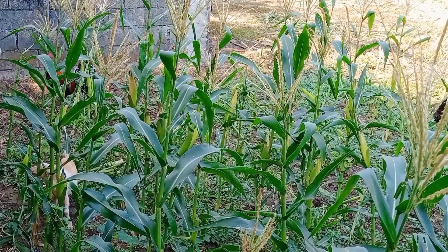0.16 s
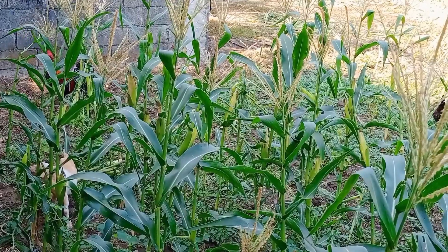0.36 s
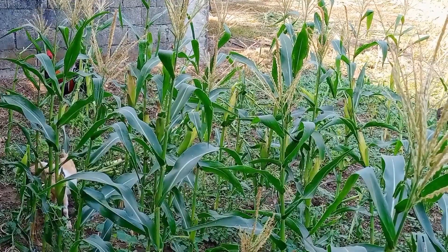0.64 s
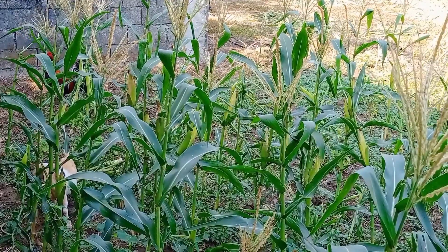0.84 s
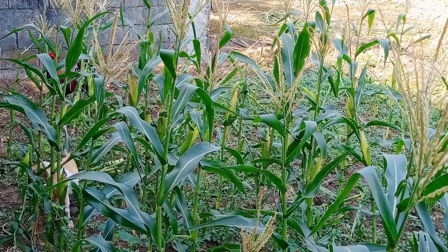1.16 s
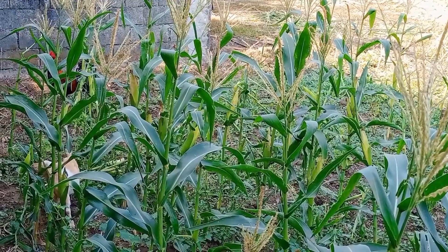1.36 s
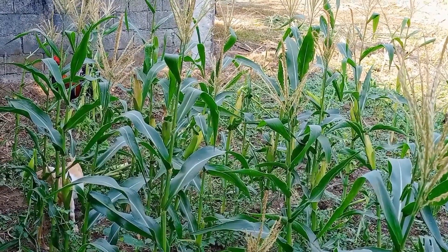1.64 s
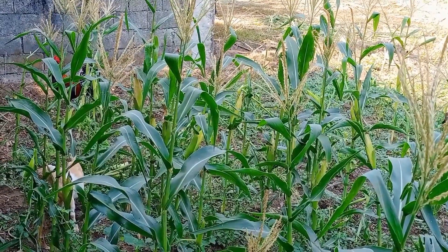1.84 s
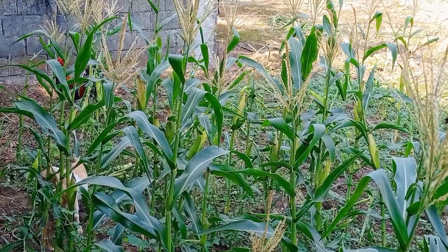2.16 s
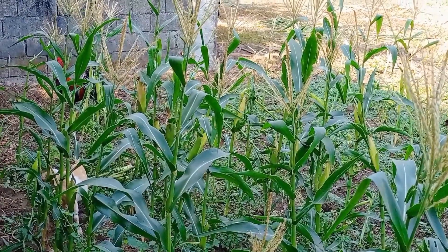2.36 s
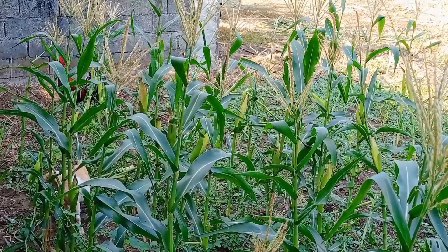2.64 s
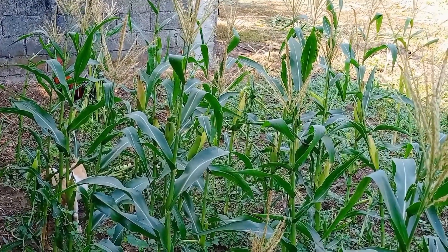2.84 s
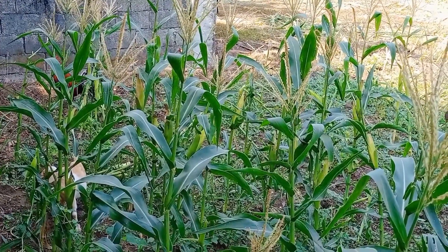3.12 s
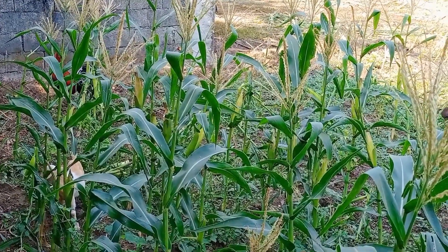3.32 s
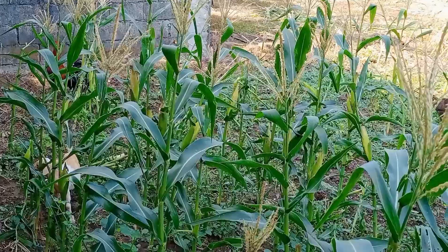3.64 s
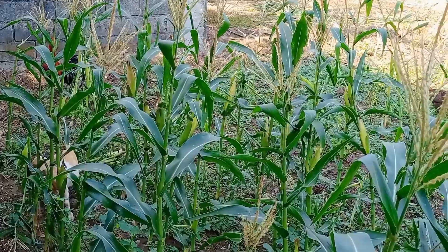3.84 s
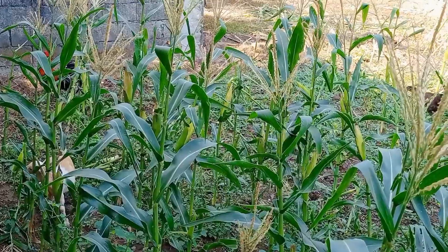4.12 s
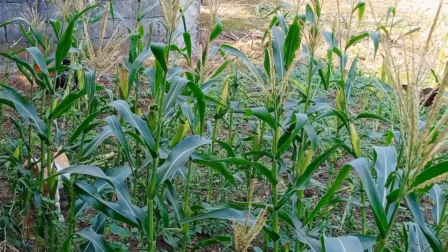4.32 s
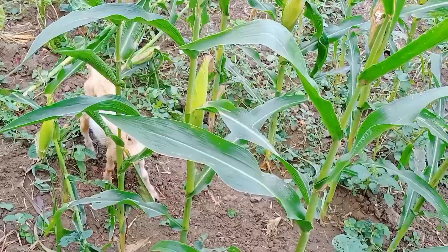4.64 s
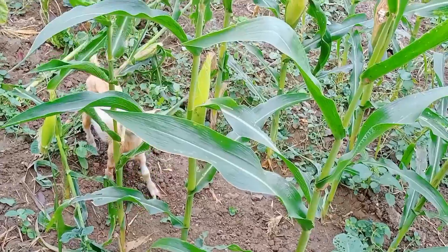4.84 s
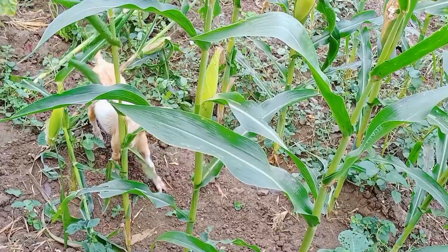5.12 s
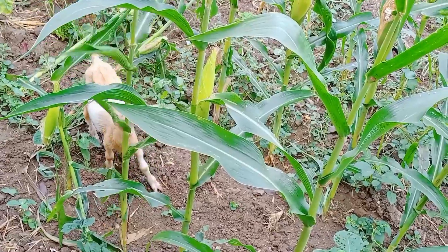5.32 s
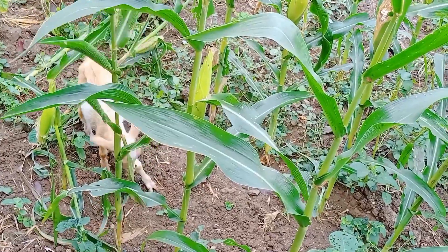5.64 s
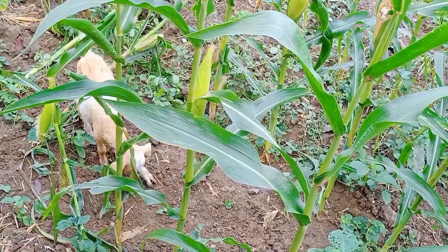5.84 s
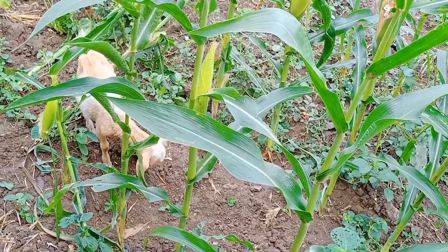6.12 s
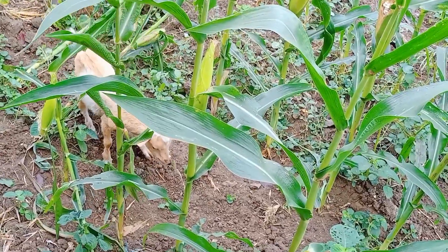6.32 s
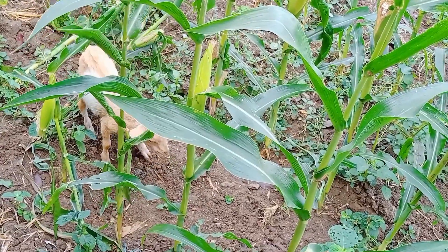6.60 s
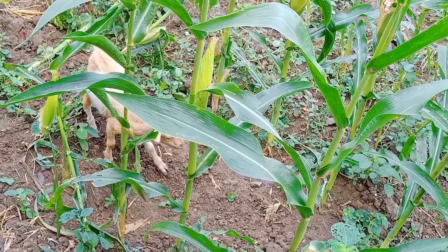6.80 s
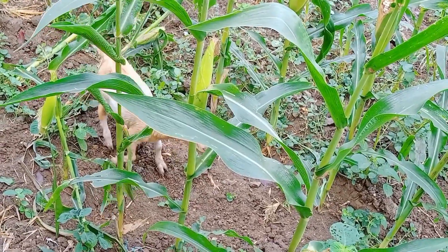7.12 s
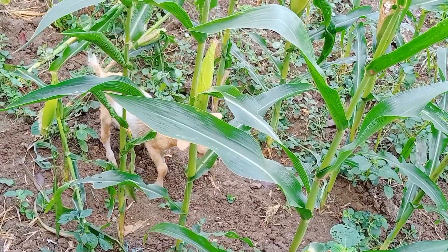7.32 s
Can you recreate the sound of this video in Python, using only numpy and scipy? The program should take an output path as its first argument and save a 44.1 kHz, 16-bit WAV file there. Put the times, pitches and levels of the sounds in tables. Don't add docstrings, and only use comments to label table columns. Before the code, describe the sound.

Outdoors at a maize plot, a buzzing bird chatter opens, then clear chirps and hooked notes take over. A near bird repeats a falling whistle followed by a short chip while gusts thump the microphone. At about 4.5 seconds the scene cuts to fast raspy chatter, with the whistle returning later. A distant flock hisses behind, and echoes linger. The sound is dense, level-pumped and slightly saturated.

```python
import sys
import numpy as np
from scipy import signal
from scipy.fft import rfft, irfft, next_fast_len
from scipy.io import wavfile
from scipy.ndimage import uniform_filter1d, minimum_filter1d

SR = 44100
rng = np.random.default_rng(int(sys.argv[2]) if len(sys.argv) > 2 else 0)


def store_wav(level_fs):
    pcm = np.round(np.clip(np.atleast_2d(level_fs), -1, 1) * 32767)
    wavfile.write(sys.argv[1], SR, pcm.T.astype(np.int16))


def makeup_ratio(level_db):
    decades = np.asarray(level_db, float) / 20
    return 10 ** decades


N = 328986

SPLICE_S, OVERLAP_S = 4.6, .1
HOARSE_S = 5.68
BREEZE_DB, NEXT_SCENE_S, NEXT_BREEZE_DB = -44.5, 4.5, -39.5
CHORUS_DB = -31
DRONE_HZ, DRONE_WIDTH_HZ = 146, 26

# start_s, length_s, from_hz, to_hz, level_db
CHATTER = [(0, 0.04, 4300, 4750, -19.5), (0, 0.035, 2806, 2750, -15.5), (.02, .02, 3990, 4050, -15.5),
           (.031, 0.34, 2900, 2678, -9), (.06, 0.12, 3240, 3545, -16.5), (.235, 0.035, 4300, 3740, -13),
           (.3, 0.31, 3730, 3540, -29.5), (.472, 0.019, 4080, 3610, -11.5), (4.495, 0.11, 4853, 3250, -12),
           (4.595, 0.1486, 3366, 3440, -5.5), (4.62, 0.26, 4180, 3740, -19), (4.665, 0.17, 2978, 3035, -8),
           (4.8, 0.17, 3093, 2930, -15.5), (4.93, 0.24, 2775, 2830, -10.5), (5.05, .15, 2392, 2513, -10.5),
           (5.17, 0.047, 2820, 3250, -17), (5.02, 0.32, 4110, 3765, -26.5), (5.425, .1, 3904, 3830, -10),
           (5.525, 0.14, 3990, 3950, -17.5), (5.51, 0.08, 3450, 3150, -9), (5.6, .1, 3016, 3462, -4.5),
           (5.7, 0.1, 3095, 2800, -7.5), (5.88, 0.1, 2517, 3040, -5), (6, 0.26, 3030, 2670, -19.5),
           (6.6, 0.14, 2910, 3030, -12), (6.802, .06, 3740, 4400, -15)]
# start_s, length_s, from_hz, to_hz, level_db
BABBLE = [(0, 0.038, 1653, 1697, -11.5), (0, 0.051, 1990, 1940, -12.5), (.045, 0.45, 2352, 2230, -8),
          (.06, 0.45, 1720, 1718, -24), (2.77, 0.16, 2178, 2000, -16), (2.78, 0.139, 1724, 1860, -19),
          (4.795, 0.16, 2352, 2074, -8), (4.8, 0.29, 1706, 1828, -9.5), (5.168, .035, 1182, 1664, -18.5),
          (5.205, .12, 1652, 1801, -3.5), (5.33, 0.11, 1550, 1867, -15), (5.595, 0.023, 2300, 2074, -12),
          (5.715, 0.047, 2340, 2230, -14), (5.81, 0.21, 2214, 1781, -9), (5.85, 0.4, 1807, 1845, -15.5),
          (5.96, .36, 2415, 2191, -6.5), (6.35, 0.19, 2276, 2066, -11.5), (6.64, .06, 2600, 1882, -10),
          (6.7, 0.087, 2328, 1915, -12), (6.68, 0.16, 1824, 1800, -32), (6.78, 0.071, 2607, 2320, -20)]
# start_s, length_s, from_hz, to_hz, level_db
SLURS = [(.75, 0.051, 3180, 2665, -15.5), (.96, 0.12, 2834, 2910, -18), (1.52, 0.02, 1696, 1660, -31),
         (1.65, 0.0097, 2990, 2180, -36), (1.66, .08, 1800, 1850, -25.5), (1.74, .1, 1950, 2260, -19.5),
         (1.82, 0.33, 2297, 2202, -25), (1.88, .24, 1580, 1770, -23.5), (2.08, 0.26, 1518, 1310, -20),
         (2.16, 0.036, 3263, 3696, -6.5), (2.73, 0.13, 1228, 1120, -28.5), (2.72, 0.064, 1836, 1820, -21),
         (2.73, 0.1, 2793, 2637, -14), (2.4, 0.27, 1055, 1056, -40.5), (2.92, 0.36, 1105, 1102, -34.5),
         (3.02, 0.058, 2134, 2217, -15.5), (3.14, 0.096, 2210, 2154, -20.5),
         (3.07, 0.1435, 2064, 1853, -15.5), (3.11, 0.16, 1572, 1488, -20.5),
         (3.29, 0.112, 1526, 1421, -11.5), (3.072, 0.036, 684, 576, -26.5), (3.89, 0.065, 2590, 2277, -28),
         (4.01, 0.16, 4120, 4160, -29.5), (4.021, 0.26, 2702, 2680, -20.5), (4.13, 0.17, 1698, 1852, -28),
         (6.45, 0.12, 3130, 3270, -48)]
# start_s, length_s, from_hz, to_hz, level_db
FAR_SEEPS = [(.02, 0.58, 7980, 8720, -38), (.211, 0.37, 9190, 9390, -42), (.411, 0.18, 5780, 5700, -48.5),
             (4, 0.26, 8070, 8450, -43), (4.17, 0.078, 4326, 4950, -40.5), (4.41, .035, 6100, 7600, -36.5),
             (4.51, 0.04, 6100, 7500, -37), (4.43, .15, 8200, 8300, -44), (3.8, .1, 8300, 8250, -46),
             (3.92, .07, 5900, 5850, -48), (4.45, .13, 6250, 6350, -44), (4.15, .2, 7300, 6000, -46)]
# start_s, length_s, from_hz, to_hz, level_db
SLIDES = [
    (.25, .05, 7640, 5020, -42),
    (3.811, .085, 9400, 5000, -32),
    (4.025, .02, 9000, 6800, -41),
    (4.155, .037, 8300, 4600, -37),
    (4.328, .08, 8700, 4650, -31),
    (4.83, .095, 9020, 4900, -41),
    (7.314, .02, 7000, 5000, -34),
]
# band_hz, t60_s
GROVE_DECAY = [(600, 1.5), (1800, 0.92), (3500, 1.52), (6000, 0.32), (10000, 0.96)]
# band_hz, level_db (per Hz)
CHORUS_SPECTRUM = [(300, -37), (500, -23), (700, -13), (1200, -15), (1700, -8), (2500, -6.5), (3800, -6),
                   (4500, -22), (5100, -27), (6500, -40), (8400, -26.5), (10500, -44), (11500, -35.5),
                   (15400, -60.5), (15800, -90.5)]
# time_s, level_db
RUSTLE = [
    (0, -4),
    (.5, -4),
    (.62, 2),
    (2.35, 4),
    (2.7, -1),
    (4.6, 1),
    (4.75, -1),
    (7.46, -3),
]
# time_s, level_db
DRONE = [
    (0, -41.5),
    (.45, -38),
    (.8, -52),
    (1.601, -56),
    (4.501, -41.5),
    (4.999, -43),
    (7.46, -48),
]
# start_s, length_s, level_db
GUSTS = [
    (1.684, 0.52, -33.5),
    (2.331, .6, -33),
    (3.048, 0.077, -30.5),
    (3.297, 0.5, -36),
    (3.818, .24, -39.5),
    (4.169, 0.32, -36),
    (6.844, 0.14, -42),
    (7.211, .14, -37),
]
# band_hz, level_db (per Hz)
BUFFET_SPECTRUM = [(15, -74.5), (25, -33), (55, -7), (109, 1), (213, -4), (600, -17.5), (677, -19.5),
                   (900, -19.5), (1170, -41), (1980, -120)]
# time_s, peak_db
THUMPS = [(1.95, -22), (2.072, -18.5), (2.389, -24.5), (2.535, -24), (3.332, -27.5), (3.557, -23),
          (3.641, -21.5), (3.932, -22), (4.22, -28), (4.28, -28), (4.368, -24), (4.999, -24), (5.403, -38),
          (5.897, -26)]
# start_s, length_s, pitch_hz, level_db
HOLDS = [(0.531, 0.17, 3406, -11), (0.711, 0.14, 5180, -31.5), (.97, 0.37, 5200, -53),
         (2.12, 0.071, 3117, -12), (4.29, 0.085, 2330, -28.5), (4.629, 0.18, 2310, -25.5),
         (5.336, 0.14, 2328, -20), (5.568, 0.063, 4960, -46), (6.07, 0.1, 5030, -45),
         (5.08, 0.14, 3980, -33), (6.33, 0.029, 3120, -17.5), (7.007, .16, 4270, -16),
         (1.048, .036, 3270, -10), (7.032, 0.039, 2820, -16), (7.346, 0.048, 3967, -12)]
# start_s, length_s, from_hz, to_hz, level_db
DROPS = [(.556, 0.027, 4900, 4500, -21), (0.68, 0.025, 4500, 3000, -17.5), (.84, 0.049, 4420, 3700, -26),
         (1.128, .012, 4600, 2300, -15), (1.647, .012, 4550, 2500, -18), (.8, .012, 4700, 3300, -30.5),
         (6.265, 0.06, 4920, 4900, -33), (6.236, 0.036, 4820, 3200, -18.5), (7.3, 0.03, 4350, 4300, -15.5),
         (6.61, 0.034, 4490, 3200, -16), (6.75, 0.051, 3810, 2610, -12.5), (6.1, 0.037, 3300, 4700, -18),
         (6.795, .024, 3000, 4600, -18.5), (7.14, 0.022, 3500, 2500, -17), (7.115, .02, 3900, 2800, -17),
         (7.166, 0.04, 4230, 2950, -8.5), (7.068, 0.026, 3877, 2725, -10.5), (7.8, 0.019, 3920, 2950, -18),
         (7.212, 0.036, 3900, 2610, -6.5), (7.248, 0.02, 3815, 2850, -14.5), (7.4, 0.039, 4190, 3680, -13)]
# start_s, length_s, from_hz, to_hz, level_db
HOOKS = [
    (.962, 0.086, 2530, 2210, -13.5),
    (1.235, 0.14, 4240, 3623, -5.5),
    (1.75, 0.15, 4154, 3504, -7.5),
    (2.225, 0.065, 2370, 2202, -13),
    (2.33, 0.062, 3884, 3478, -5),
    (2.33, 0.022, 2260, 2235, -24),
    (5.015, 0.08, 4340, 3930, -26.5),
    (6.158, .078, 6040, 4720, -25),
]
# start_s, length_s, from_hz, to_hz, level_db
RISES = [
    (1.088, 0.055, 3420, 3960, -6),
    (1.57, 0.091, 3157, 4030, -10),
    (6.59, .06, 3590, 3850, -10.5),
    (6.98, 0.03, 4120, 4370, -15.5),
]
# start_s, length_s, from_hz, to_hz, level_db
SEEPS = [(1.981, 0.16, 8560, 8980, -45), (2.17, 0.056, 8200, 9050, -36), (2.28, 0.039, 7950, 8110, -33.5),
         (2.391, 0.17, 9270, 8780, -41.5), (2.491, 0.077, 8400, 8540, -51), (2.55, 0.036, 7800, 8430, -33),
         (2.62, 0.15, 8730, 8550, -33), (2.72, 0.34, 8060, 8550, -36.5), (2.811, 0.16, 9130, 10100, -34.5),
         (4.99, 0.14, 9640, 9130, -37.5), (5.931, 0.22, 8320, 8470, -45), (6.11, 0.43, 9500, 9500, -48.5)]
# start_s, length_s, from_hz, to_hz, level_db
PLUNGES = [
    (6.553, .04, 7100, 3600, -15),
    (6.925, .024, 7000, 4600, -33),
    (7.314, .024, 7000, 4100, -21),
]
# after_onset_s, pitch_hz, level_db
WHISTLE = [(-.004, 3600, -20), (.003, 4650, -4), (.05, 3960, 0), (.095, 3600, -2), (.13, 3520, -4),
           (.175, 3520, -7)]
# after_onset_s, pitch_hz, level_db
CHIP = [(-.01, 3933, -30), (0, 4350, -1), (.016, 3820, 3), (.04, 3050, -6.5), (.072, 2600, -12)]
# after_onset_s, pitch_hz, level_db
FLICK = [(-.003, 4200, -3), (.004, 6300, -6), (.01, 6400, -34), (.017, 6200, -9), (.028, 5900, -13)]
# start_s, level_db
WHISTLES = [
    (1.8814, -12),
    (2.4014, -10),
    (2.9477, -8.5),
    (3.5194, -7),
    (5.7854, -17),
    (6.334, -8),
    (6.8783, -8),
    (7.4354, -13.5),
]
# start_s, level_db
CHIPS = [
    (2.1493, -12),
    (2.6741, -14),
    (3.2306, -13),
    (3.8083, -13.5),
    (6.0746, -21),
]
# start_s, level_db
FLICKS = [(2.115, -31), (2.382, -38), (2.643, -31), (2.928, -38), (3.206, -33), (3.499, -36), (3.777, -33),
          (5.772, -46), (6.041, -46), (6.858, -45), (7.134, -39)]
# time_s, peak_db
TICKS = [
    (2.4994, -31),
    (3.6486, -35),
    (6.57, -40.5),
    (6.9127, -37),
]
# band_hz, level_db
CAPSULE = [(6500, -21.5), (8500, -19.5), (10300, -27.5), (11400, 6), (13500, 5.5), (15000, -24)]


def evened(x):
    return x / np.sqrt(np.mean(x ** 2) + 1e-20)


def read(points, hz):
    f, value = np.transpose(points)
    return np.interp(np.log(hz + 1), np.log(f + 1), value)


def coloured(x, points):
    size = next_fast_len(len(x))
    gain = makeup_ratio(read(points, np.fft.rfftfreq(size, 1 / SR)))
    return irfft(rfft(x, size) * gain, size)[:len(x)]


def add(mix, s, sound):
    part = mix[round(max(s, 0) * SR):][:len(sound)]
    part += sound[:len(part)]


def drift(hz):
    z = rfft(rng.standard_normal(N))
    return evened(irfft(z * np.exp(-(np.fft.rfftfreq(N, 1 / SR) / hz) ** 2), N))


def note(rows, warble, fade_s=0.0027):
    s, hz, db = np.transpose(rows)
    t = np.arange(s[0], max(s[-1], s[0] + .01), 1 / SR)
    pitch = uniform_filter1d(np.interp(t, s, hz), size=200, mode="nearest")
    pitch *= 1 + warble[np.clip((t * SR).astype(int), 0, N - 1)]
    edges = np.clip(np.minimum(t - t[0], t[-1] - t) / fade_s, 0, 1)
    level = np.sqrt(2) * makeup_ratio(np.interp(t, s, db)) * np.sin(np.pi / 2 * edges) ** 2
    return level * np.sin(2 * np.pi * np.cumsum(pitch) / SR)


def flock(notes, unsteady, hz=30, trill=0):
    mix, wobble = np.zeros(N), drift(hz)
    warble = trill + unsteady * evened(wobble - uniform_filter1d(wobble, size=2200))
    for rows in notes:
        add(mix, rows[0][0], note(rows, warble))
    return mix


def sung(notes, ease, crest, rise_db, fade_db):
    u = np.linspace(0, 1, num=12)
    crest = np.clip(crest, .05, .95)
    before = np.maximum(1 - u / crest, 0)
    after = np.maximum((u - crest) / (1 - crest), 0)
    swell_db = rise_db * before ** 2 + fade_db * after ** 2
    return [np.transpose([s + length * u, to_hz + (from_hz - to_hz) * (1 - u) ** ease, db + swell_db])
            for s, length, from_hz, to_hz, db in notes]


def hidden_birds():
    beat = 2 * np.pi * np.cumsum(76 * (1 + .12 * drift(6))) / SR
    warble = .022 * np.where(np.arange(N) / SR < HOARSE_S, 1, 1.8)
    upper = flock(sung(CHATTER, 1.3, 0.66, -3, -8), warble, 70, .035 * np.sin(beat))
    lower = flock(sung(BABBLE, 1.2, 0.9, 0.5, -5), warble, 60, .04 * np.sin(beat))
    calm = flock(sung(SLURS, 1.7, 0.53, 0.5, -4.5) + sung(FAR_SEEPS, 2.2, 1.0, 4.5, -6), 0.02, hz=45)
    calm += flock(sung(SLIDES, 1.1, 0.19, -1, -3), 0.0036)
    pulses = 1.5 * (.5 + .5 * np.cos(beat)) ** 1.3 + .15
    flutter = makeup_ratio(3.5 * drift(40))
    return (upper + lower) * pulses * flutter, calm * flutter


def grove(old, new, gap_s, early_db):
    taps = rng.standard_normal(SR + SR // 2)
    hz, t, z = signal.stft(taps, SR, nperseg=256)
    decay = makeup_ratio(-60 * t / read(GROVE_DECAY, hz)[:, None])
    tail = signal.istft(z * decay, SR, nperseg=256)[1]
    age = np.arange(len(tail)) / SR - gap_s
    tail *= (age > 0) * (1 + makeup_ratio(early_db) * np.exp(-np.maximum(age, 0) / 0.011))
    tail /= np.linalg.norm(tail)
    cut = np.clip((SPLICE_S - np.arange(N) / SR) / .03, 0, 1)
    return cut * signal.fftconvolve(old, tail)[:N] + signal.fftconvolve(new, tail)[:N]


def chorus():
    frames, hz = N // 256 + 5, np.fft.rfftfreq(1024, 1 / SR)
    a, b, patches = rng.standard_normal((frames, 513, 3)).T
    patches = uniform_filter1d(patches, size=6, axis=0)
    patches = evened(uniform_filter1d(patches, size=30, axis=1))
    z = (a + 1j * b) * makeup_ratio(read(CHORUS_SPECTRUM, hz)[:, None] + 3.0 * patches)
    rustle_db = np.interp(np.arange(frames) * 256 / SR, *np.transpose(RUSTLE))
    low = np.clip((1800 - hz) / 400, 0, 1)
    z *= makeup_ratio(np.outer(low, rustle_db))
    return makeup_ratio(CHORUS_DB) * evened(signal.istft(z, nperseg=1024, noverlap=768)[1][:N])


def drone():
    hz, (s, db) = np.fft.rfftfreq(N, 1 / SR), np.transpose(DRONE)
    band = np.exp(-((hz - DRONE_HZ) / DRONE_WIDTH_HZ) ** 2)
    hum = irfft(rfft(rng.standard_normal(N)) * band, N)
    return makeup_ratio(np.interp(np.arange(N) / SR, s, db)) * evened(hum)


def wind_level():
    t = np.arange(N) / SR
    level = makeup_ratio(np.where(t < NEXT_SCENE_S, BREEZE_DB, NEXT_BREEZE_DB))
    for s, length, db in GUSTS:
        level += makeup_ratio(db) * np.sin(np.pi * np.clip((t - s) / length, 0, 1)) ** 0.69
    return level


def wind():
    lumps = uniform_filter1d(rng.standard_normal(N), size=600)
    lumps = evened(uniform_filter1d(lumps, size=600))
    turbulence = rng.standard_normal(N) * makeup_ratio(3.6 * lumps)
    rumble = evened(coloured(turbulence, BUFFET_SPECTRUM + [(1500, -80.5)]))
    out = rumble * wind_level()
    u = np.arange(-200, 500) / SR / 0.00079
    for s, db in THUMPS:
        add(out, s, makeup_ratio(db + 5.0) * -u * np.exp(.5 - u ** 2 / 2))
    return coloured(out, [(25, -12.5), (70, 2.0)])


def neighbours():
    holds = [(s, length, hz, hz, db) for s, length, hz, db in HOLDS]
    notes = sung(holds, 1.1, 0.14, -2.0, -7.5)
    notes += sung(DROPS, 1.1, .45, -4, -5)
    notes += sung(HOOKS, 2.2, .6, -9, -5)
    notes += sung(RISES, .4, .5, -6, -16)
    notes += sung(SEEPS, 2.2, 0.26, -1.1, -20.5)
    notes += sung(PLUNGES, 1.7, .85, -20, -2)
    return flock(notes, 0.0042)


def near_bird(shape, events, db_up):
    return flock([np.add(shape, (s, 0, db + db_up)) for s, db in events], 0.0012)


def leaves():
    out, t = np.zeros(N), np.arange(200) / SR
    for s, db in TICKS:
        grit = rng.standard_normal(200)
        add(out, s, makeup_ratio(db + 1.0) * grit * np.exp(-t / 0.00087))
    return coloured(out, [(1000, -28), (8000, 10), (11000, 6), (14000, -26.0)])


def scene():
    before = np.arange(N) / SR < SPLICE_S
    chatter, calm = hidden_birds()
    seen = near_bird(WHISTLE, WHISTLES, 0.16) + near_bird(CHIP, CHIPS, 1.0) + neighbours()
    flicks = near_bird(FLICK, FLICKS, 0.45)
    stir = (seen + 0.37 * flicks) * (1 + 1.51 * drift(50))
    birds = seen + flicks + makeup_ratio(-5) * grove(stir * before, stir * ~before, 0.0018, 2.5)
    birds += makeup_ratio(-6) * chatter + makeup_ratio(-11) * calm
    old = calm * before + chatter * (np.arange(N) / SR < SPLICE_S - OVERLAP_S)
    birds += makeup_ratio(-1.5) * grove(old, chatter + calm - old, 0.0041, 5.9)
    return (makeup_ratio(-2.0) * birds + chorus() + drone() + wind() + leaves())[None]


def low_pass(x):
    return signal.sosfilt(signal.butter(12, 15830, fs=SR, output="sos"), x)


def record(dry):
    power_db = 10 * np.log10(abs(uniform_filter1d(dry[0] ** 2, size=500)) + 1e-12)
    fall_db = np.arange(N) * 60. / SR
    over_db = np.maximum(np.maximum.accumulate(power_db + fall_db) - fall_db + 28.5, 0)
    lag = np.exp(-1 / (0.0013 * SR))
    lagged_db = signal.lfilter([1 - lag], [1, -lag], over_db - over_db[0])
    level = dry[0] / makeup_ratio(0.41 * lagged_db + 0.93 * over_db[0] - 15.0)
    level *= makeup_ratio(-4.4)
    peaks = -minimum_filter1d(-abs(level), size=201)
    level /= np.maximum(uniform_filter1d(peaks, size=101) / .88, 1)
    bent = makeup_ratio(-36.5) * level ** 2 + makeup_ratio(-12.0) * level ** 3
    overtones = coloured(bent, [(4600, -75)] + CAPSULE + [(15800, -64.5)])
    return low_pass((level + overtones)[None])


dry = scene()
out = record(dry)
store_wav(out)
```